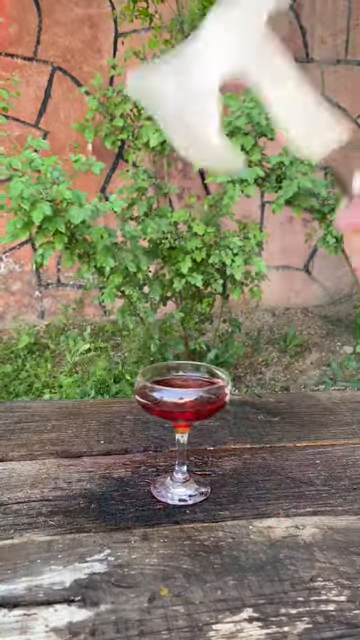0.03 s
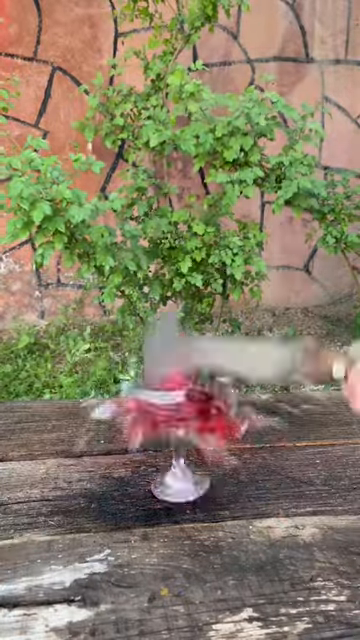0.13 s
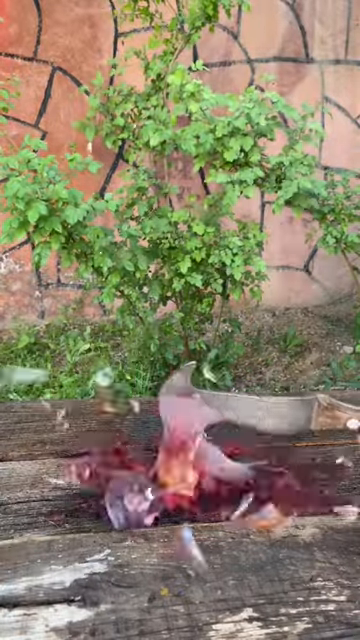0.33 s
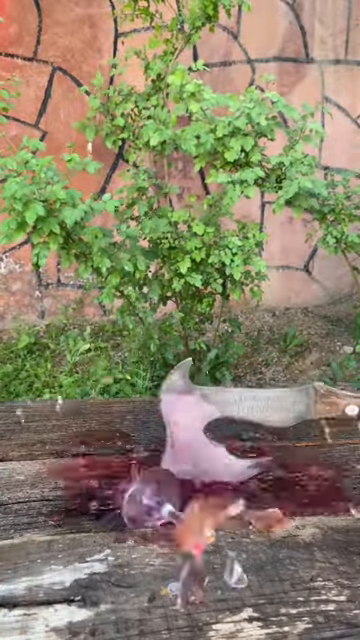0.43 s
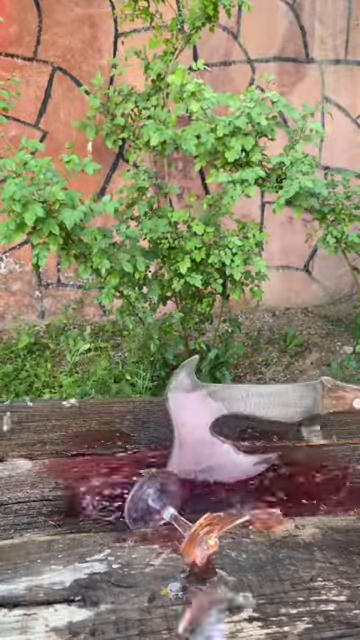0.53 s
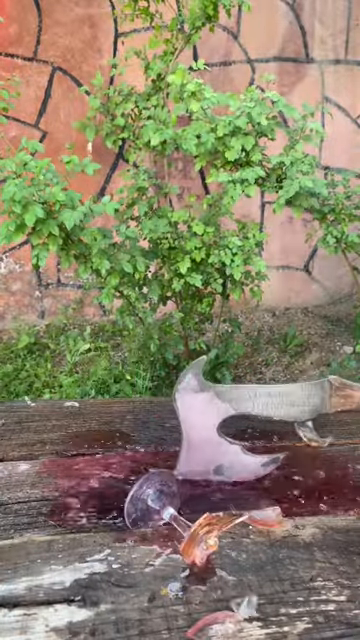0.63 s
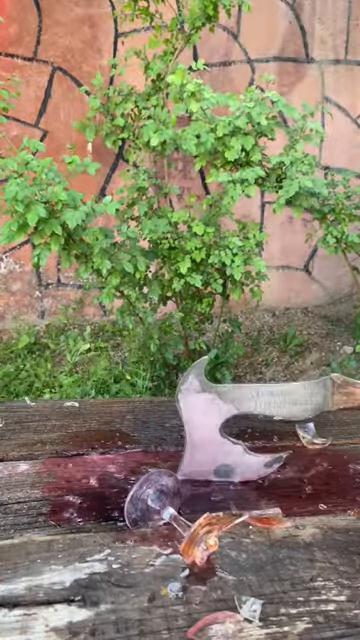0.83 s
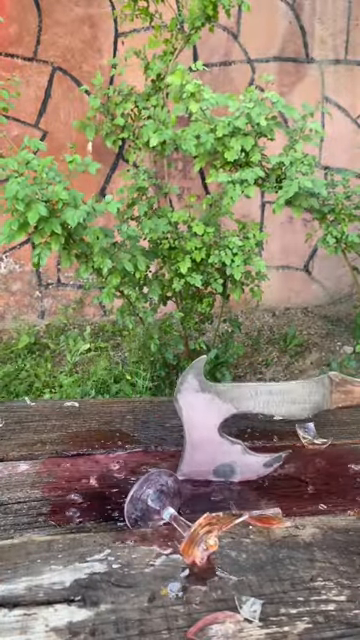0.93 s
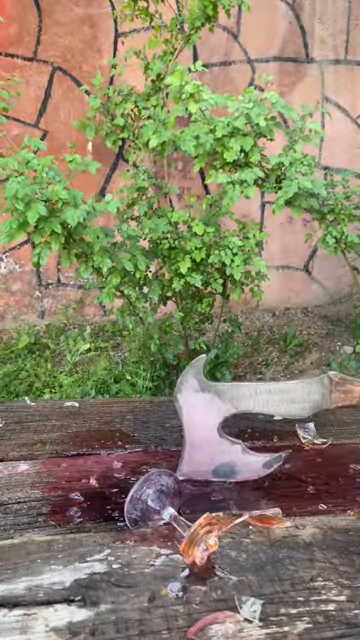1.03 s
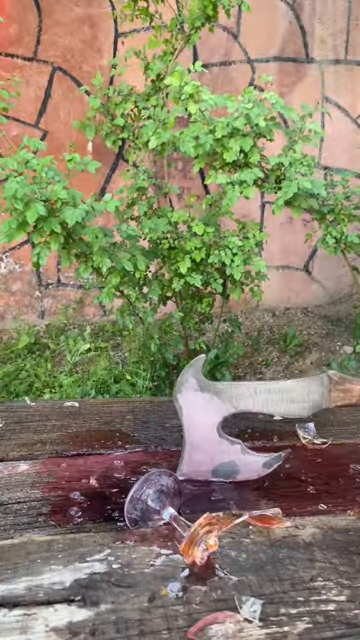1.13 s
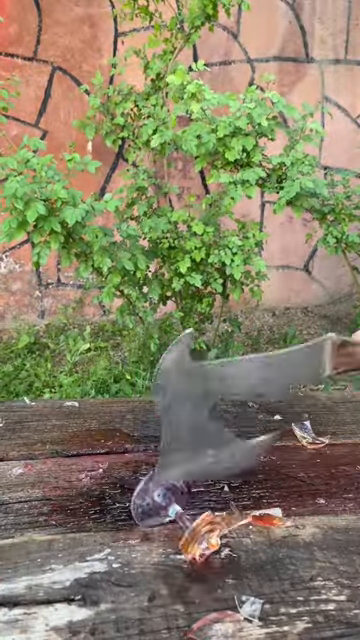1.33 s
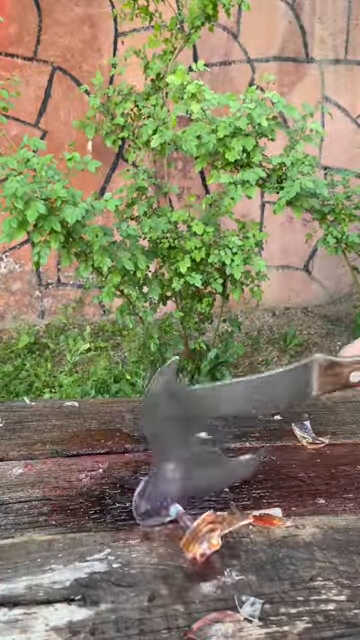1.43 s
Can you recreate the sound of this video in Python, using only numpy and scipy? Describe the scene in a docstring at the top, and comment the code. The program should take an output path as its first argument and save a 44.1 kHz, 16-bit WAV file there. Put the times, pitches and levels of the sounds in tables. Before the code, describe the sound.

An axe smashes a stemmed glass on wooden planks, a sharp burst, then shards clink down

```python
"""Faint outdoor hiss and wind in a garden, then an axe smashes a stemmed glass of drink close to the microphone.
The bowl cracks in noise bursts and sine clinks; filtered noise drops of drink spatter the wooden planks.
The blade thuds into the wood as decaying plank modes; shards ring as wavering sines and clink down.
A stone wall returns a short noise tail, and soft low bumps follow as sines that sag in pitch.
Near the end the level dips sharply and comes only part of the way back."""
import sys
import numpy as np
from scipy import signal
from scipy.fft import rfft, irfft
from scipy.io import wavfile
from scipy.ndimage import uniform_filter1d

SR = 44100
rng = np.random.default_rng(int(sys.argv[2]) if len(sys.argv) > 2 else 0)


def dump(signal):
    """Clip the signal to [-1, 1] and save it as 16-bit WAV at the path in sys.argv[1]."""
    limited = np.clip(np.atleast_2d(signal).T, -1, 1)
    pcm = np.round(limited * 32767).astype(np.int16)
    wavfile.write(sys.argv[1], SR, pcm)


N = 66150
T = np.arange(N) / SR  # seconds

# Outdoor hiss. Each row: frequency in Hz, relative level in dB.
HISS_COLOUR = [(80, -9.5), (180, 1), (400, -2.5), (1300, -7.5), (2600, -12), (4200, -10.5), (7500, -24),
               (9500, -33.5), (11500, -56.5)]
HISS_START_DB, HISS_FADE_DB_PER_S = -47.5, 2.5
# Wind at the microphone. Each row: frequency in Hz, relative level in dB.
WIND_COLOUR = [(20, -20.5), (62, -0.5), (110, -6.5), (200, -23), (1000, -74)]
# Rise and fall of the wind. Each row: time in seconds, level in dB.
WIND_LEVEL = [(0, -50.5), (.26, -49), (.3, -76.5), (.62, -42), (.78, -53), (.95, -42.5), (1.12, -42.5),
              (1.2, -48), (1.34, -41.5), (1.5, -42)]
# How unlike the two sides are, from 0 for identical.
CRACK_APART, HISS_APART, WIND_APART = 0.37, 0.85, 0.93

# Drink and crumbs of glass on the wood. Each row: time in seconds, level in dB (first level held before it).
SPATTER_LEVEL = [(.22, -56), (.25, -32.5), (.3, -35.5), (.35, -47.5), (.44, -44), (.6, -41), (.7, -49.5),
                 (.9, -53.5), (1.0, -66)]
# Tone of the spatter. Each row: frequency in Hz, relative level in dB.
SPATTER_COLOUR = [(100, -11), (220, 3), (800, -1), (3000, -8), (8000, -17), (16000, -57)]
DROPS_PER_S, DROP_SPREAD_DB = 4500, 2

# Fractures of the glass. Each row: start in seconds, level in dB, t60 in seconds.
CRACKS = [(0.2131, -21.5, 0.098), (.2211, -5, 0.049), (0.2315, -6, 0.02), (.2343, -11.5, 0.014),
          (0.244, -33.5, 0.072), (0.2584, -11.5, 0.033), (0.5797, -11.5, 0.0053)]
# Tone of breaking glass. Each row: frequency in Hz, relative level in dB.
CRACK_COLOUR = [(300, -21), (900, -13.5), (1650, 1), (2700, -8), (3800, -3.5), (5600, -4), (7200, -11.5),
                (11000, -24), (16000, -30.5)]
CRACK_RISE_S, CRACK_GRAIN_DB = .0006, 2.5
# Splinters parting after the break: start, level, decay and unevenness.
CRUMBLE_S, CRUMBLE_DB, CRUMBLE_T60_S, CRUMBLE_GRAIN_DB = .235, -39, 0.41, 6
# Damped clinks of glass on the blade. Each row: start in seconds, pitch in Hz, level in dB, t60 in seconds.
CLINKS = [(0.212, 3750, -24.5, 0.09), (0.211, 6610, -19.5, 0.074), (0.2217, 1665, -9.5, 0.026),
          (.2225, 2100, -17.5, .05), (.234, 3635, -3.5, 0.022), (.234, 3840, -15.5, .07),
          (0.245, 3220, -19, 0.06), (.245, 3090, -26, .05), (0.2588, 3630, -5, 0.0061),
          (0.2594, 3940, 0, 0.0073), (0.26, 4850, -4, 0.011)]
CLINK_RISE_S = 0.00083

SWARM_LOW_HZ, SWARM_HIGH_HZ, SWARM_FADE_DB_PER_S = 2003, 12830, 128.5
# Small pieces ringing as they break free or collide. Each row: start in seconds, mean spread in seconds,
# level in dB before colour and fade, middle t60 in seconds, lowest pitch in Hz.
SWARMS = [(.222, .016, -24, 0.043, SWARM_LOW_HZ), (0.259, 0.037, -30, 0.042, 4400),
          (0.345, 0.013, -40, 0.19, 7700), (0.511, 0.0071, -51, 0.05, 8800),
          (.559, 0.021, -41.5, 0.079, 5100)]

# Ring of the largest piece of the bowl. Each row: time in seconds, pitch in Hz, level in dB.
BOWL_RING = [(0.232, 1795, -23.5), (.28, 1740, -36.5), (0.361, 1780, -41.5), (.4, 1810, -45),
             (.559, 1835, -57)]

# Blade, stem and shards on the planks. Each row: start in seconds, level in dB, centre in Hz.
KNOCKS = [(0.2324, -12, 685), (0.2326, -11.5, 180), (.275, -23.5, 563), (.278, -18.5, 205),
          (.385, -32.5, 890), (0.507, -35, 596), (0.5201, -23, 870), (.522, -30.5, 235), (.558, -13.5, 607),
          (0.5585, -21.5, 1370), (0.565, -28.5, 142), (.5815, -22, 880), (0.635, -44, 1200),
          (.649, -30, 660), (0.657, -30.5, 1120), (.665, -37.5, 167.7), (.704, -38, 804), (.755, -34, 278),
          (0.8278, -37, 590), (.849, -35, 1490), (0.8906, -35, 556)]
# Plank modes. Each row: pitch in Hz, level in dB before each knock's band, t60 in seconds.
PLANK_MODES = [(141.2, -1, 0.12), (206.6, 1, 0.091), (252, 2.5, 0.089), (408, -9.5, 0.017),
               (494, -2.5, 0.056), (565.6, -1.5, .055), (787, -3, 0.085), (940, 1.5, 0.029),
               (1166, -12, 0.14), (1544, -0.5, 0.03)]
KNOCK_OCTAVES, KNOCK_RISE_S = 0.93, 0.00093
PUFF_DB, PUFF_T60_S = 1.5, 0.043
PLANK_LOW_HZ = 95  # the planks radiate little below this

# Partials of loose shards. Each row: start in seconds, pitch in Hz before wavering and sinking,
# level in dB before wavering, t60 in seconds, swell in seconds.
SHARD_RINGS = [(.235, 1954, -42.5, 0.61, .004), (.26, 3405, -28, 0.13, .002),
               (.26, 4037, -31, 0.14, 0.0023), (.32, 3670, -45, 0.49, 0.043),
               (.338, 5335, -33.5, 0.27, 0.02), (.353, 9590, -46, 0.15, 0.0044),
               (.352, 11800, -50, .14, .004), (0.379, 1953, -25.5, 0.13, 0.019),
               (0.329, 4060, -39.5, 0.23, 0.12), (.38, 5190, -43, 0.18, 0.035),
               (.45, 1953, -38.5, 0.77, 0.061), (.511, 5335, -40.5, 0.19, 0.019),
               (0.513, 11700, -37.5, 0.05, 0.00079), (.559, 1803, -27, 0.11, 0.014),
               (0.5577, 5600, -30.5, 0.13, 0.00063), (0.581, 8700, -48.5, 0.22, 0.0025),
               (.58, 6530, -29.5, 0.069, 0.0012), (.58, 14450, -35, 0.13, 0.00075),
               (0.689, 9180, -41.5, 0.21, 0.0011), (.69, 12000, -51, 0.17, 0.0012),
               (.726, 7480, -31.5, 0.22, 0.0019), (1.074, 8950, -56.5, 0.2, 0.011)]
TUMBLE_MIDDLE_HZ, TUMBLE_DEPTH, TUMBLE_SHIFT = 14, .25, .0025  # depth and shift are fractions
RECEDE_PER_S = 0.021  # fraction by which pitch sinks as a shard flies off
FLUTTER_PER_HZ, FLUTTER_S = .00005, .0022
# Splinters landing. Each row: start in seconds, level in dB, centre in Hz.
TICKS = [(.3845, -25.5, 3520), (0.5213, -24.5, 3340), (0.5312, -29.5, 3970), (0.557, -23.5, 3740),
         (0.572, -43, 3530), (.583, -21.5, 4570), (0.6331, -28.5, 5800), (.651, -32, 3130),
         (0.69, -30, 5230), (0.7245, -34, 4000), (0.769, -34.5, 5400), (0.952, -40.5, 6200)]
TICK_T60_S, TICK_OCTAVES = 0.013, 0.6
# A shard skids.
SCRAPE_S, SCRAPE_DB, SCRAPE_T60_S, SCRAPE_HZ, SCRAPE_RISE_S = .859, -35.5, 0.15, 3130, 0.0024

# Stone wall's tail. Each row: frequency in Hz, t60 in seconds.
WALL_T60 = [(100, .25), (2000, 0.37), (14000, 0.96)]
WALL_DB, WALL_DELAY_S = -22, .012

# Soft low bumps. Each row: start in seconds, level in dB, settled pitch in Hz, t60 in seconds, swell in seconds.
BUMPS = [(.843, -23, 85.6, 0.1, 0.0034), (1.226, -26, 60.4, 0.18, 0.03), (1.231, -33, 114, 0.19, 0.0086)]
BUMP_DROP, BUMP_DROP_S = 1, 0.004  # extra pitch at the start, as a fraction, and its time constant

# Phase between the microphone ports. Each row: frequency in Hz, lead of the left in radians.
PORT_PHASE = [(0, 0), (5500, 1.33), (6500, 2), (7500, 4), (8100, 4), (11000, 7.5), (14400, 10)]
# Balance of the microphone ports. Each row: frequency in Hz, left minus right in dB.
PORT_BALANCE = [(100, -1), (480, -5), (1200, -.5)]
# Microphone roll-off. Each row: frequency in Hz, gain in dB.
TREBLE = [(11800, 0), (13200, -11.5)]
# Overall level with its brief dip. Each row: time in seconds, gain in dB (first gain held before it).
DIP = [(1.405, -1.5), (1.432, -23), (1.46, -7.5), (1.5, -8.5)]
CEILING, EDGE_HZ = .95, 15900  # overload ceiling in full scale, upper band limit


def amp(db):
    """Decibels to linear gain."""
    return 10 ** (np.asarray(db) / 20)


def unit(x):
    """Scales to rms 1."""
    return x / np.sqrt(np.mean(x ** 2) + 1e-20)


def read(points, hz):
    """Reads a curve on a log-frequency axis."""
    f, value = np.transpose(points)
    return np.interp(np.log(hz + 1), np.log(f + 1), value)


def level(points):
    """A dB curve as gain over time."""
    return amp(np.interp(T, *np.transpose(points)))


def add(mix, s, sound):
    """Lays a sound into the mix from s seconds on."""
    part = mix[:, max(round(s * SR), 0):]
    part += sound[..., :part.shape[1]]


def envelope(rise, t60):
    """Smooth rise to 1, then an exponential fall of 60 dB per t60."""
    attack = np.sin(np.pi / 2 * np.minimum(T / rise, 1)) ** 2
    return attack * 1000. ** (-np.maximum(T - rise, 0) / t60)


def hump(hz, centre_hz, octaves):
    """Gain of a broad band around a centre."""
    return (1 + (np.log2((hz + 1) / centre_hz) / octaves) ** 2 / 2) ** -2


def colour(x, gain_at):
    """Causal minimum-phase filter of unit energy with the given gain per frequency."""
    size = 2048
    log_gain = np.log(np.maximum(gain_at(abs(np.fft.fftfreq(size, 1 / SR))), 1e-5))
    taps = np.fft.ifft(np.exp(np.conj(signal.hilbert(log_gain)))).real
    return signal.oaconvolve(x, taps[None] / np.linalg.norm(taps), axes=1)[:, :N]


def pair(x, apart):
    """Left and right from a shared and an opposed signal."""
    return np.array([x[0] + apart * x[1], x[0] - apart * x[1]]) / np.hypot(1, apart)


def uneven(spread_db):
    """Random grain gains, most of them small and a few large."""
    return amp(spread_db * np.minimum(rng.exponential(1, N), 4))


def burst(rise, t60, gain_at, grain_db):
    """A dying cloud of tiny clicks of uneven size, coloured."""
    shape = envelope(rise, t60)
    clicks = rng.standard_normal((2, N)) * uneven(grain_db)
    sound = pair(colour(clicks * shape, gain_at), CRACK_APART)
    return unit(sound) * np.sqrt(np.mean(shape ** 2) / 2)  # as strong as a sine under this envelope


def air(spectrum, apart):
    """Steady noise of a given colour, for the hiss and wind of the garden."""
    gain = amp(read(spectrum, np.fft.rfftfreq(N, 1 / SR)))
    noise = irfft(rfft(rng.standard_normal((2, N))) * gain, N)
    return unit(pair(noise, apart))


def spatter():
    """Drops and crumbs rain on the wood as random filtered impulses."""
    drops = (rng.random(N) < DROPS_PER_S / SR) * uneven(DROP_SPREAD_DB)
    wet = colour(drops * rng.standard_normal((2, N)), lambda hz: amp(read(SPATTER_COLOUR, hz)))
    return level(SPATTER_LEVEL) * unit(pair(wet, CRACK_APART))


def shatter():
    """The bowl cracks in quick stages, clinks on the blade and crumbles; a piece snaps again as it lands."""
    out = np.zeros((2, N))
    glass = lambda hz: amp(read(CRACK_COLOUR, hz))
    for s, db, t60 in CRACKS:
        add(out, s, amp(db) * burst(CRACK_RISE_S, t60, glass, CRACK_GRAIN_DB))
    for s, hz, db, t60 in CLINKS:
        add(out, s, amp(db) * envelope(CLINK_RISE_S, t60) * np.sin(2 * np.pi * hz * T))
    crumble = burst(CRACK_RISE_S, CRUMBLE_T60_S, glass, CRUMBLE_GRAIN_DB)
    add(out, CRUMBLE_S, amp(CRUMBLE_DB) * crumble)
    return out


def swarm(count):
    """Bursts of small pieces, each with its own pitch and direction; later ones in a burst are weaker."""
    out = np.zeros((2, N))
    for s, spread, burst_db, t60, lowest in SWARMS:
        for k, (pitch, when, length, side) in enumerate(rng.random((count, 4))):
            hz = SWARM_LOW_HZ * (SWARM_HIGH_HZ / SWARM_LOW_HZ) ** ((k + pitch) / count)
            if hz < lowest:
                continue
            late = -spread * np.log(1 - when)
            db = burst_db + read(CRACK_COLOUR, hz) / 2 - SWARM_FADE_DB_PER_S * late
            phase = (side - .5) * np.array([[1], [-1]])  # direction, as opposite phase on the two sides
            tone = np.sin(2 * np.pi * hz * T + phase)
            add(out, s + late, amp(db) * envelope(CRACK_RISE_S, t60 * (.5 + length)) * tone)
    return out


def bowl():
    """The largest piece of the bowl rings on; its pitch dips, then climbs as the drink runs off."""
    s, hz, db = np.transpose(BOWL_RING)
    tone = np.sin(2 * np.pi * np.cumsum(np.interp(T, s, hz)) / SR)
    sounding = (T > s[0]) * (T < s[-1])
    return amp(np.interp(T, s, db)) * sounding * tone


def planks():
    """Each knock rings the plank's modes near its centre, with a puff of rough wood."""
    out = np.zeros((2, N))
    for s, db, centre in KNOCKS:
        band = lambda hz: hump(hz, centre, KNOCK_OCTAVES) * hz ** 2 / (hz ** 2 + PLANK_LOW_HZ ** 2)
        gains = np.array([amp(mode_db) * band(hz) for hz, mode_db, _ in PLANK_MODES])
        modes = np.zeros(N)
        for k, (hz, _, t60) in enumerate(PLANK_MODES):
            sign = (-1) ** k  # neighbouring modes start in opposite directions
            modes += sign * gains[k] * envelope(KNOCK_RISE_S, t60) * np.sin(2 * np.pi * hz * T)
        puff = amp(PUFF_DB) * burst(KNOCK_RISE_S, PUFF_T60_S, band, CRACK_GRAIN_DB)
        add(out, s, amp(db) * (modes / np.linalg.norm(gains) + puff) / np.sqrt(2))
    return out


def flutter(hz):
    """Random gain from twice-smoothed noise, deeper for higher pitches."""
    width = round(FLUTTER_S * SR)
    slow = uniform_filter1d(uniform_filter1d(rng.standard_normal(N), width), width)
    return 1 + FLUTTER_PER_HZ * hz * unit(slow)


def shards():
    """Loose pieces ring, wavering as they tumble and sinking as they recede; they tick down, and one skids."""
    out = np.zeros((2, N))
    draws = rng.random((len(SHARD_RINGS), 2))
    for (s, hz, db, t60, swell), (speed, turn) in zip(SHARD_RINGS, draws):
        spin = np.sin(2 * np.pi * (TUMBLE_MIDDLE_HZ * (.5 + speed) * T + turn))
        pitch = hz * (1 + TUMBLE_SHIFT * spin - RECEDE_PER_S * T)
        tone = np.sin(2 * np.pi * np.cumsum(pitch) / SR) * flutter(hz)
        add(out, s, amp(db) * envelope(swell, t60) * (1 + TUMBLE_DEPTH * spin) * tone)
    for s, db, centre in TICKS:
        band = lambda hz: hump(hz, centre, TICK_OCTAVES)
        add(out, s, amp(db) * burst(CRACK_RISE_S, TICK_T60_S, band, CRACK_GRAIN_DB))
    skid_band = lambda hz: hump(hz, SCRAPE_HZ, octaves=0.98)
    skid = burst(SCRAPE_RISE_S, SCRAPE_T60_S, skid_band, CRUMBLE_GRAIN_DB)
    add(out, SCRAPE_S, amp(SCRAPE_DB) * skid)
    return out


def wall(x):
    """A short diffuse tail from the wall and the ground: noise dying at its own rate in each band."""
    hz, t, z = signal.stft(rng.standard_normal((2, SR // 2)), SR, nperseg=256)
    decay = 1000. ** (-t / read(WALL_T60, hz)[:, None])
    tail = signal.istft(z * decay, SR, nperseg=256)[1]
    out = np.zeros((2, N))
    add(out, WALL_DELAY_S, signal.fftconvolve(x, tail / np.linalg.norm(tail[0]), axes=1))
    return out


def bumps():
    """Dull low bumps that start sharp and sag in pitch."""
    out = np.zeros((2, N))
    for s, db, hz, t60, swell in BUMPS:
        turns = np.cumsum(hz * (1 + BUMP_DROP * np.exp(-T / BUMP_DROP_S))) / SR
        add(out, s, amp(db) * envelope(swell, t60) * np.sin(2 * np.pi * turns))
    return out


def ports(x):
    """The two microphone ports hear near sounds with different phase and level, and a treble roll-off."""
    hz = np.fft.rfftfreq(2 * N, 1 / SR)
    phase = np.interp(hz, *np.transpose(PORT_PHASE))
    half = amp(read(PORT_BALANCE, hz) / 2) * np.exp(.5j * phase)  # each side takes half the difference
    return irfft(rfft(x, 2 * N) * amp(read(TREBLE, hz)) * np.array([half, 1 / half]))[:, :N]


def scene():
    """The smash and its wall tail through the ports, over bumps and garden air."""
    near = shatter() + bowl() + swarm(count=48) + shards() + planks() + spatter()
    hiss = amp(HISS_START_DB - HISS_FADE_DB_PER_S * T) * air(HISS_COLOUR, HISS_APART)
    wind = level(WIND_LEVEL) * air(WIND_COLOUR, WIND_APART)
    return ports(near + amp(WALL_DB) * wall(near)) + bumps() + hiss + wind


def record(dry):
    """A brief dip in level, soft overload, then the band limit."""
    edge = signal.firwin(401, EDGE_HZ, window=("kaiser", 9), fs=SR)
    loud = CEILING * np.tanh(dry * level(DIP) / CEILING)
    return signal.oaconvolve(loud, edge[None], "same", axes=1)


dry = scene()
out = record(dry)
dump(out)
```